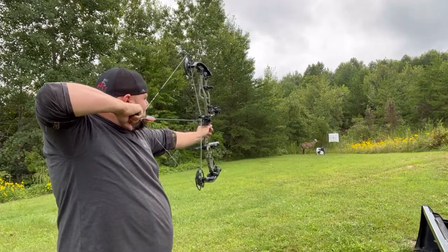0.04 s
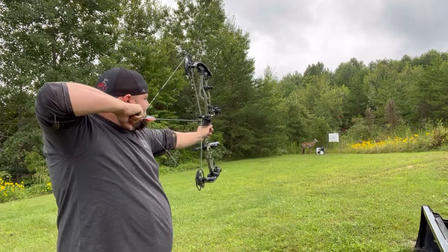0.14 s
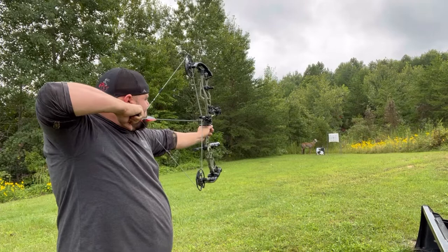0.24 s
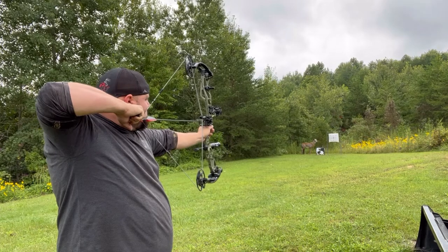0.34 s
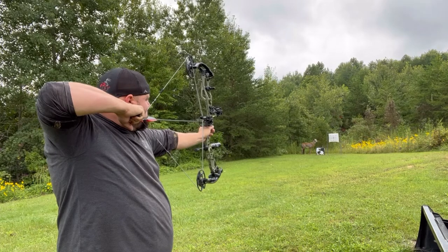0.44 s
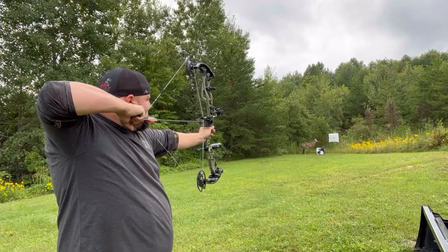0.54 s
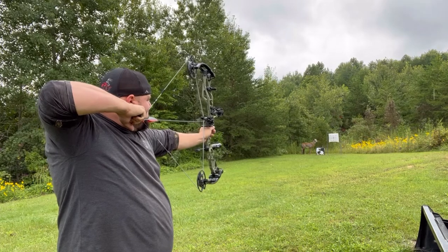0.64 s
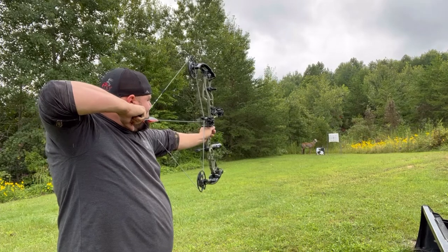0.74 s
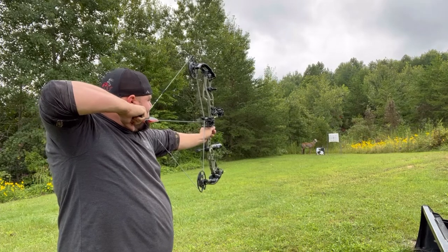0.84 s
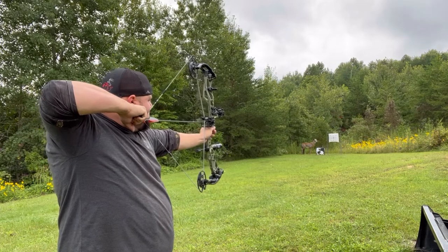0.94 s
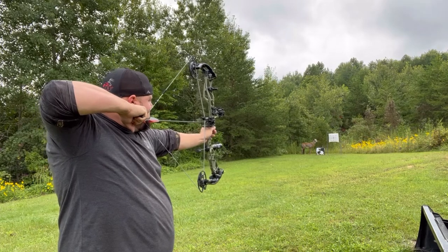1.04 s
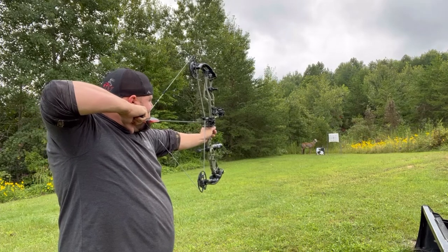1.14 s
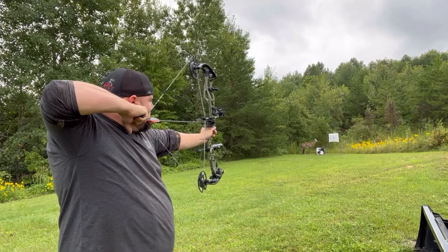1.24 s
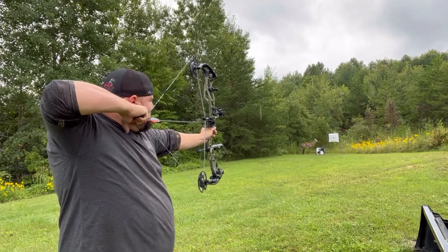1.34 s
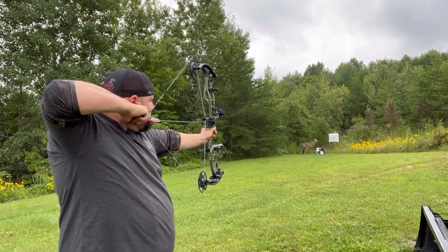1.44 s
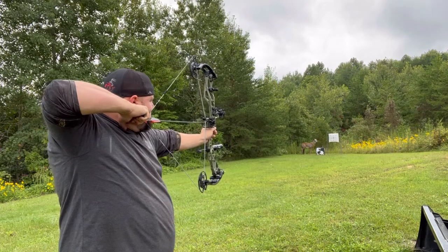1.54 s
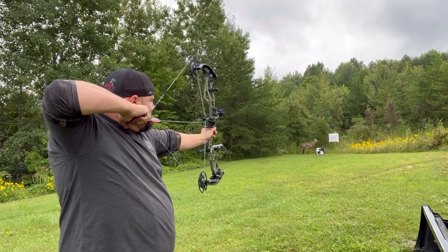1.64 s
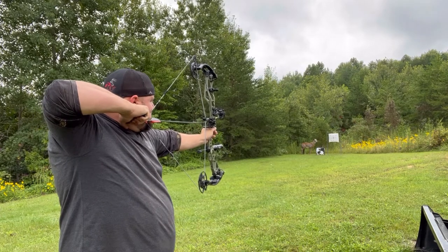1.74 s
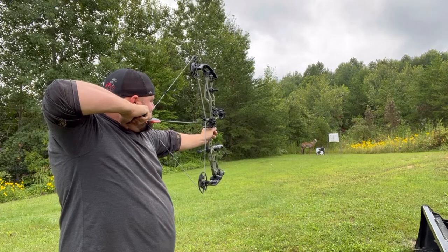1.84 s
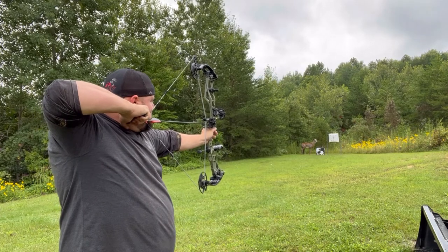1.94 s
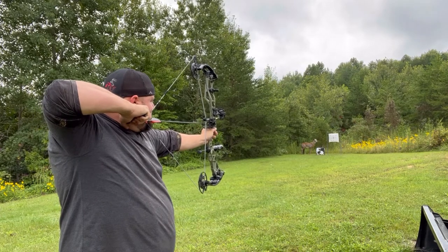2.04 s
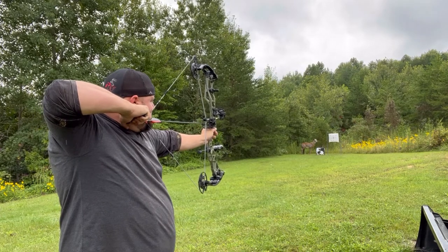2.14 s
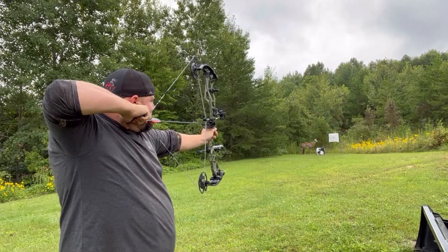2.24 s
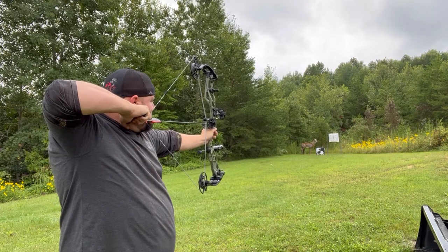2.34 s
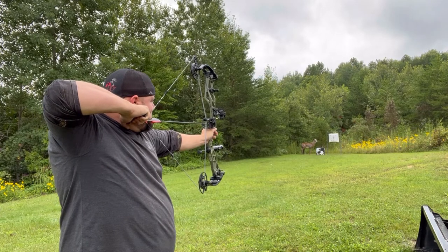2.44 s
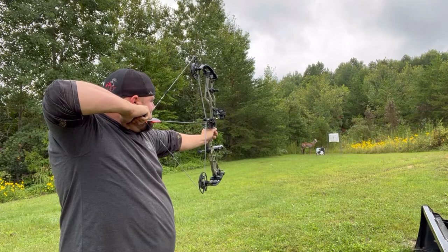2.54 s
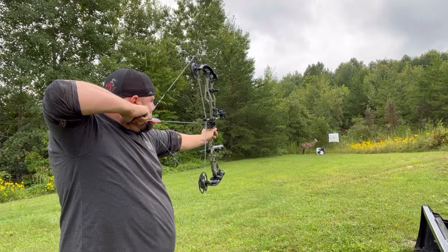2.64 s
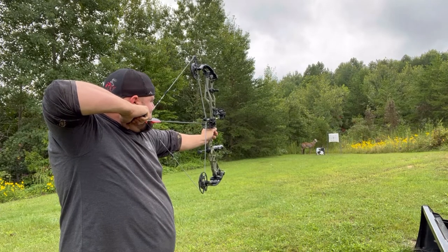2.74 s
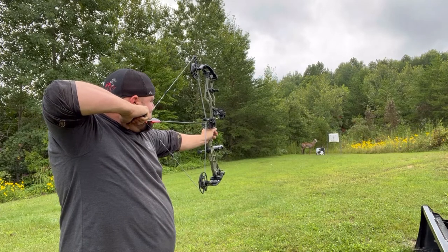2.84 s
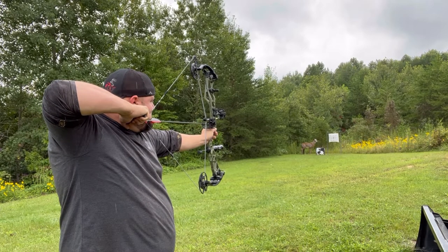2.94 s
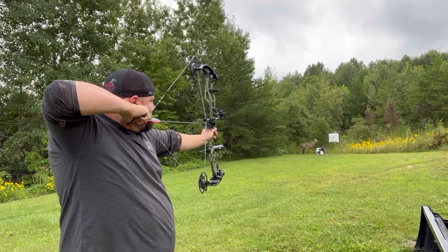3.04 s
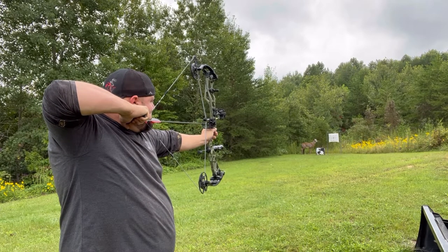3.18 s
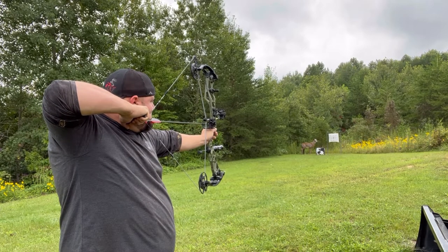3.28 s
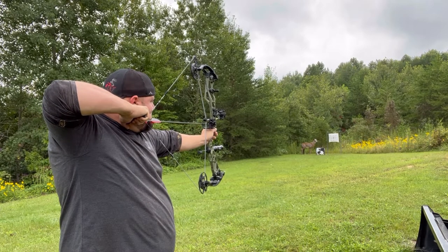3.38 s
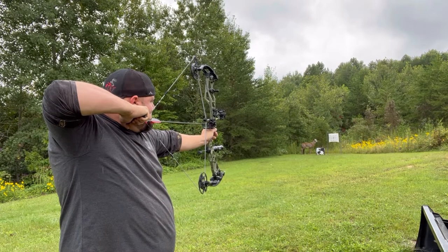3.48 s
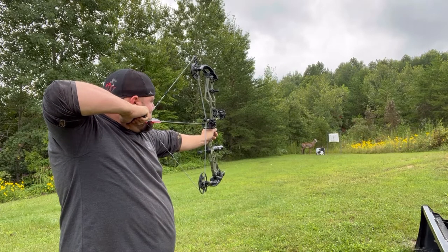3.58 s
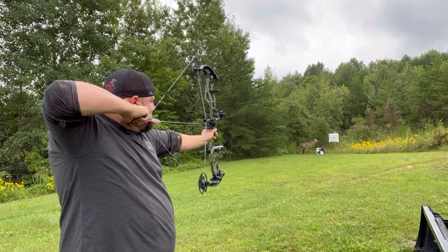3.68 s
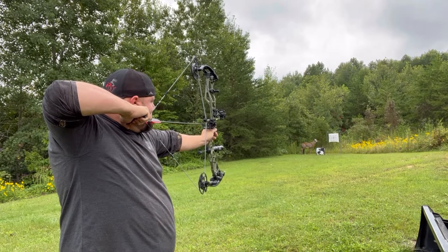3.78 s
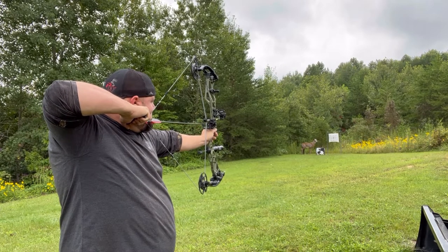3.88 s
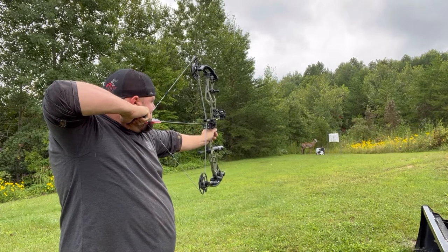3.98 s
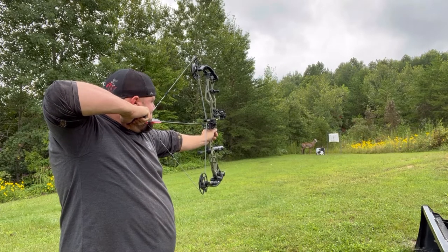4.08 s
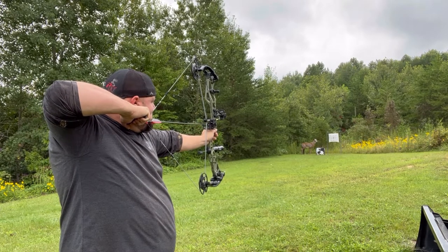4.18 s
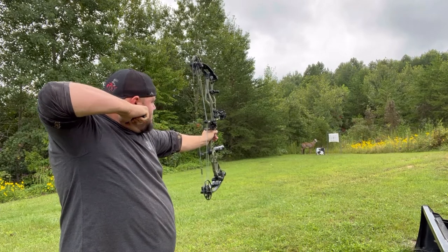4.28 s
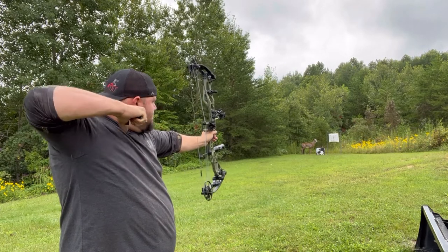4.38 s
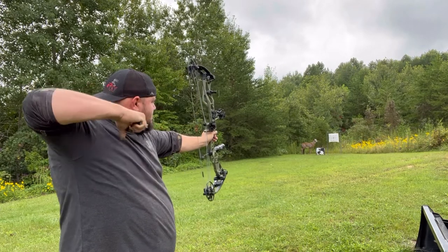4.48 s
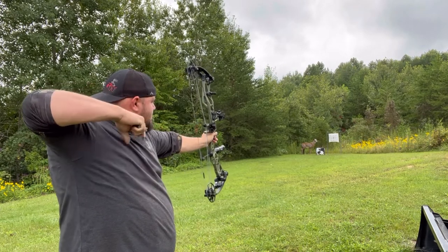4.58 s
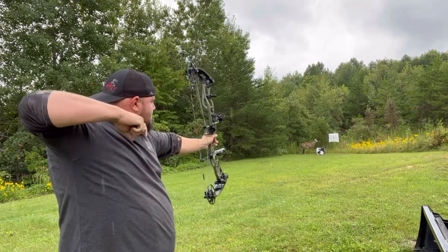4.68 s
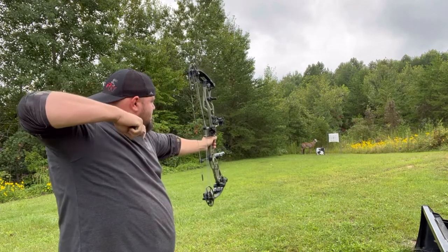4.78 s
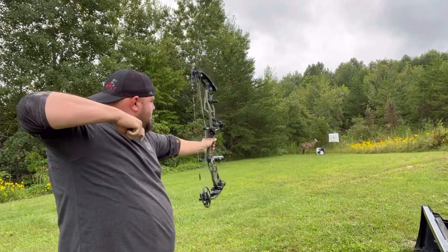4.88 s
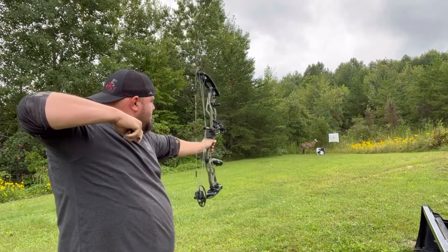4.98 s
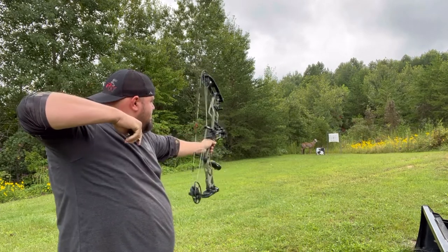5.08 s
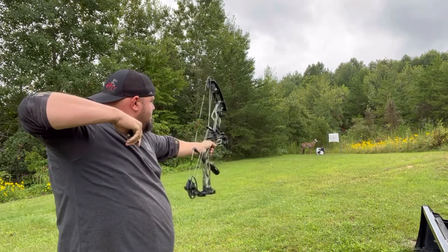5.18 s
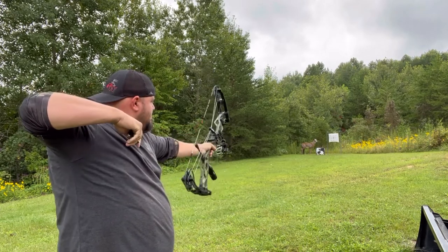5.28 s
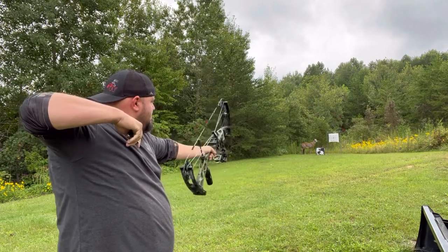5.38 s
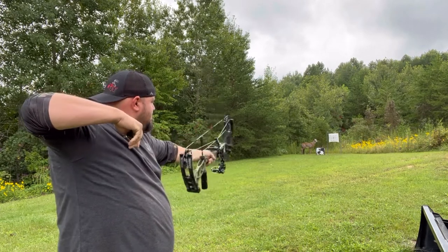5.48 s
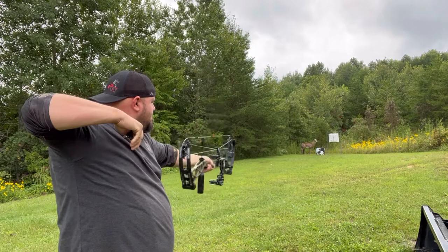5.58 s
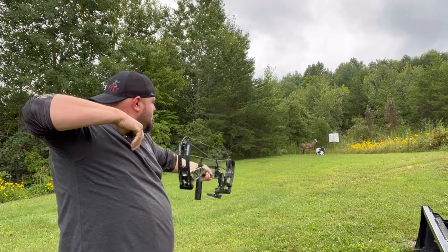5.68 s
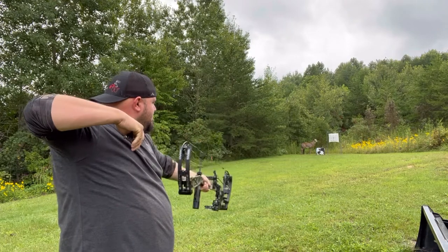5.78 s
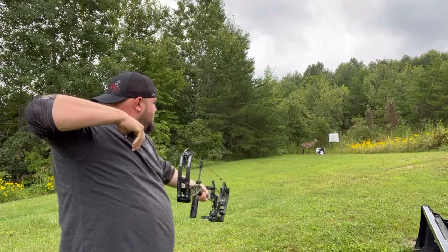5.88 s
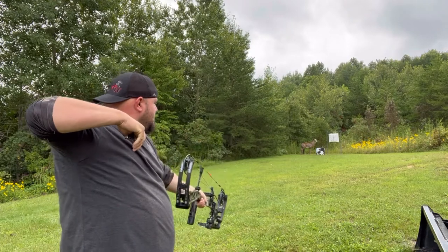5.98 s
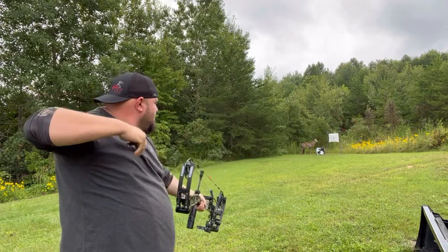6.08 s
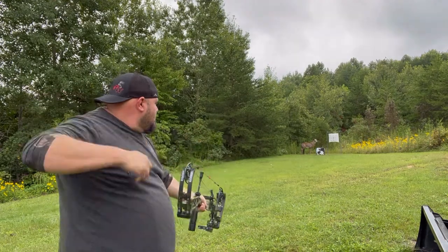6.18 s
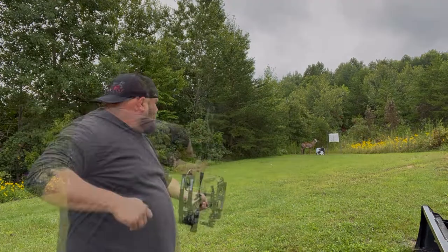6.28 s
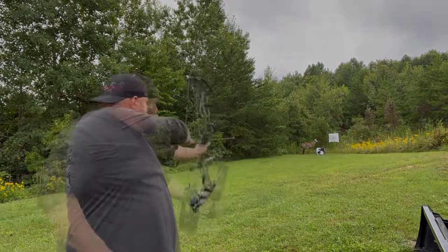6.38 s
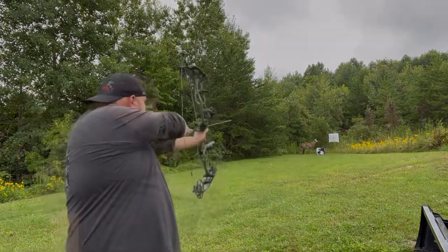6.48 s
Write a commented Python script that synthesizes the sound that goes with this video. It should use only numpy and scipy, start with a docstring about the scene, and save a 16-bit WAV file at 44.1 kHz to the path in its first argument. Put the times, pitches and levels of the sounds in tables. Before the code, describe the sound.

Steady high insect trilling outdoors, broken by a bow's click and loud twang-thump, then an arrow's hard thud, with insects continuing afterward.

```python
"""Crickets and a katydid sing all round a lawn at the edge of a wood: shaped noise pulsed by wing strokes.
A compound bow is shot: the release ticks, the arrow slides off, the string slams into its stop, and the
bow shudders, as decaying modes and noise bursts. A third of a second later the arrow smacks into the
target with a falling thud; ground and trees answer in grainy decaying bands. A soft thud follows."""
import sys
import numpy as np
from scipy import signal
from scipy.fft import rfft, irfft, next_fast_len
from scipy.io import wavfile

SR = 44100
rng = np.random.default_rng(int(sys.argv[2]) if len(sys.argv) > 2 else 0)


def materialize(psi):
    """Save the field psi as 16-bit PCM at rate SR to the path in sys.argv[1].

    A 1-D psi becomes a single channel; in a 2-D psi each row is a channel.
    """
    bounded = np.clip(np.atleast_2d(psi).T, -1, 1)
    quanta = np.round(bounded * 32767).astype(np.int16)
    wavfile.write(sys.argv[1], SR, quanta)


N = 287532
TIME = np.arange(N) / SR   # [s]


def from_db(db):
    """Logarithmic level: decibels become an amplitude gain."""
    return 10 ** (np.asarray(db) / 20)


def rms_one(x):
    """Normalisation: scale a signal to unit mean power."""
    return x / np.sqrt(np.mean(x ** 2) + 1e-20)


def at_hz(rows, hz):
    """Spectral interpolation: each column of a table, read on a logarithmic frequency axis."""
    f, *columns = np.transpose(rows)
    return [np.interp(np.log(hz + 1e-9), np.log(f), c) for c in columns]


def since(s):
    """Elapsed time: seconds gone by since a moment, zero before it."""
    return np.maximum(TIME - s, 0)


def drift(rate):
    """Random fluctuation: straight lines between normal random values, at so many values per second."""
    knots = rng.standard_normal(400)
    return np.interp(TIME * rate, np.arange(len(knots)), knots)


def throb(per_s, depth, wander=0.032):
    """Amplitude modulation: wing strokes at a slightly unsteady rate."""
    strokes = np.cumsum(per_s * (1 + wander * drift(4.3))) / SR
    return 1 + np.clip(depth, 0, 1) * np.sin(2 * np.pi * strokes)


def add(out, s, sound):
    """Superposition: mix a short sound in at a time."""
    at = int(round(s * SR))
    out[:, at:at + sound.shape[-1]] += sound[..., :N - at]


def pair(white, alike):
    """Interaural correlation: left and right as sum and difference of two unrelated noises."""
    alike = np.clip(alike, -.998, .998)
    common = np.sqrt(1 + alike) * white[0]
    opposed = np.sqrt(1 - alike) * white[1]
    return common + opposed * np.array([[1], [-1]])


# likeness of left and right: (frequency [Hz], correlation [-1 to 1])
EAR_LIKENESS = [(60, 0.61), (250, 0.47), (700, -0.1), (1500, -.1), (2300, 0.13), (2750, -0.25),
                (3000, -0.77), (3500, -0.011), (4100, 0.37), (5200, -0.29), (6800, 0.47), (8500, 0.76),
                (9700, 1), (11200, 0.99), (12400, 0.89), (13200, 1)]


def hiss(colour_db):
    """Spectral shaping: steady stereo noise coloured by a function of frequency, rms 1."""
    size = next_fast_len(N, real=True)
    hz = np.arange(size // 2 + 1) * SR / size
    white = rng.standard_normal((2, 2 * len(hz))).view(complex)
    spectrum = pair(white, at_hz(EAR_LIKENESS, hz)[0]) * from_db(colour_db(hz))
    return rms_one(irfft(spectrum, size)[:, :N])


def song(centre_hz, width_hz):
    """Resonance: noise in the band of many slightly different wings, 11 dB down one width off centre."""
    return hiss(lambda hz: -36 * np.log10(1 + ((hz - centre_hz) / width_hz) ** 2))


def band(x, low_hz, high_hz):
    """Causal filtering: a Butterworth band-pass."""
    edges_hz = [low_hz, min(high_hz, .45 * SR)]
    return signal.sosfilt(signal.butter(2, edges_hz, "band", fs=SR, output="sos"), x)


def burst(low_hz, high_hz, t60, alike):
    """Impulsive excitation: band noise of rms 1 under a sharp onset and an exponential decay."""
    t = TIME[:SR // 8]
    noise = rms_one(band(pair(rng.standard_normal((2, len(t))), alike), low_hz, high_hz))
    return noise * from_db(-60 * t / t60) * (1 - np.exp(-t / .0001))


def ringing(modes, spread_db):
    """Modal superposition: struck modes die away, each with a slightly random strength."""
    t = TIME[:SR // 2]
    hz, mode_db, t60 = np.transpose(modes)[:, :, None]
    level_db = mode_db + spread_db * rng.standard_normal(hz.shape) - 60 * t / t60
    return np.sum(from_db(level_db) * np.sin(2 * np.pi * hz * t), axis=0)


def tail(table, rise_s, alike_below_hz, lumpy_db, grain_db):
    """Diffuse scattering: half-octave noise bands die at their own rates, grainy, alike in the lows."""
    t, out = TIME[:int(SR * min(max(row[2] for row in table), 1))], 0   # at most 1 s
    lumps = drift(38)[:len(t)]
    grain_knots = rng.standard_normal(SR // 60)
    grains = from_db(grain_db * np.interp(t, TIME[:SR:60], grain_knots))
    white = rng.standard_normal((2, 2, SR))[..., :len(t)] * grains
    for k, low in enumerate(40 * 2 ** np.arange(0, 8.6, .5)):
        hz = low * 2 ** (1 / 4)
        level_db, t60 = at_hz(table, hz)
        alike = max(1.4 / (1 + (hz / alike_below_hz) ** 2) - .2, at_hz(EAR_LIKENESS, hz)[0])
        noise = pair(white[k % 2], alike)   # neighbouring bands get unrelated noise
        out = out + rms_one(band(noise, low, low * np.sqrt(2))) * from_db(level_db - 60 * t / t60)
    return out * (1 - np.exp(-t / rise_s)) * from_db(lumpy_db * lumps)


def to_ears(sound, lag_s):
    """Interaural delay: a mono sound reaches the right ear later by the lag, earlier if negative."""
    t = TIME[:len(sound)]
    return np.array([np.interp(t - max(late_s, 0), t, sound, left=0) for late_s in (-lag_s, lag_s)])


def thud(level_db, first_hz, glide_s, rise_s, fade_s):
    """Yielding impact: a blow on something that gives way swings ever more slowly."""
    t = TIME[:SR // 12]
    turns = first_hz * glide_s * np.log1p(t / glide_s)
    swell = (1 - np.exp(-(t / rise_s) ** 2)) * np.exp(-t / 0.06) / (1 + (t / fade_s) ** 2)
    return -from_db(level_db) * swell * np.sin(2 * np.pi * turns)


def swing(s, level_db, hz, cycles):
    """Gaussian tone burst: it peaks around a time and is down to 1/e the given cycles either side."""
    turns = (TIME - s) * hz
    return from_db(level_db) * np.exp(-(turns / cycles) ** 2) * np.sin(2 * np.pi * turns)


# from SWELL_START_S on, the air and most of the insects swell
INSECTS_GAIN_DB_PER_S = 0.277
SWELL_START_S, AIR_SWELL_DB_PER_S, INSECTS_SWELL_DB_PER_S = 5.91, 11, 5.5


def insect_swell():
    """Shared gain: a slow rise in decibels, then a faster one."""
    return from_db(INSECTS_GAIN_DB_PER_S * TIME + INSECTS_SWELL_DB_PER_S * since(SWELL_START_S))


# colour of the moving air: (frequency [Hz], relative level [dB])
AIR_COLOUR = [(20, -9.5), (55, 1.5), (100, 1.5), (170, -5.5), (250, -8), (310, -5), (400, -9.5),
              (600, -11.5), (1500, -13.5), (2200, -13.5), (4000, -25)]
# colour of the blurred far insects: (frequency [Hz], relative level [dB])
FAR_INSECT_COLOUR = [(1800, -25), (2800, -5), (3250, -6), (3600, -3), (4200, -2), (5100, -4.5),
                     (5600, -1.5), (7800, -3), (9000, -5.5), (11500, -8.5), (12900, -2), (14200, 2.5),
                     (15600, .5)]
AIR_DB, CHORUS_DB, FAR_INSECTS_DB = -70, -53, -53   # before the swells


def meadow():
    """Incoherent sum: moving air, a trilling carpet of ground crickets and the blur of far insects."""
    air_db = AIR_DB + AIR_SWELL_DB_PER_S * since(SWELL_START_S)
    air = from_db(air_db + drift(5.6)) * hiss(lambda hz: at_hz(AIR_COLOUR, hz)[0])
    chorus = from_db(CHORUS_DB) * throb(46, depth=0.11, wander=0.033) * song(6760, 820)
    far = from_db(FAR_INSECTS_DB) * hiss(lambda hz: at_hz(FAR_INSECT_COLOUR, hz)[0])
    return air + insect_swell() * (chorus * from_db([[-.5], [.5]]) + far)   # carpet slightly to the right


# single crickets, level before the shared swell; a start of 0 means already joining in:
# (start [s], centre [Hz], width [Hz], level [dB], pulses [1/s], pulse depth [0-1],
#  chirps [1/s], chirp depth [0-1])
CRICKET_VOICES = [(1.25, 2328, 130, -80.5, 10, 0.52, 1.3, .1), (1.7, 2760, 110, -76.5, 11, 0.38, .82, .1),
                  (2.2, 2985, 100, -76, 11, .2, 0.86, .1), (0, 3610, 90, -78.5, 30, .2, 1.1, .1),
                  (0, 4155, 70, -75, 30, .2, .6, .3), (0, 4710, 300, -68.8, 25, 0.35, 3.6, .25),
                  (0, 5260, 90, -76.5, 21, .3, .7, .2)]
CRICKET_ATTACK_S = 0.22


def crickets():
    """Double amplitude modulation: nearer crickets pulse and chirp, each on its own pitch."""
    out = 0
    for start_s, hz, width_hz, level_db, pulses, pulse_depth, chirps, chirp_depth in CRICKET_VOICES:
        strokes = throb(pulses, pulse_depth, wander=0.018) * throb(chirps, chirp_depth, wander=0.017)
        strokes = strokes * from_db(0.67 * drift(14))
        attack = 1 - np.exp(-since(start_s) / CRICKET_ATTACK_S)
        out = out + from_db(level_db) * attack * strokes * song(hz, width_hz)
    return insect_swell() * out


# pure trills out of the carpet: (frequency [Hz], level before the shared swell [dB])
TRILL_TONES = [(6842, -64), (7160, -69), (7345, -73), (6595, -69)]
TRILL_WANDER_HZ = 9


def trills():
    """Frequency wander: a few ground crickets hold nearly pure pitches, fading in and out."""
    out = 0
    for hz, level_db in TRILL_TONES:
        turns = np.cumsum(hz + TRILL_WANDER_HZ * drift(20)) / SR
        strength = from_db(level_db + 2.6 * drift(4.5)) * throb(46, depth=.4)
        out = out + strength * np.sin(2 * np.pi * turns)
    return insect_swell() * out


# level before the shared swell; the first chirp peaks at CHIRP_FIRST_S
CHIRP_DB, CHIRP_FIRST_S, CHIRPS_PER_S = -58.5, .14, 3.59
STROKES_PER_S, STROKE_START_HZ, STROKE_FALL_HZ = 25, 4874, 464


def near_cricket():
    """Frequency glide and convolution: uneven wing strokes slide down, blurred by echoes off the grass."""
    stroke = np.cumsum(STROKES_PER_S * (1 + .12 * drift(12))) / SR % 1   # place within the stroke
    turns = np.cumsum(STROKE_START_HZ - STROKE_FALL_HZ * stroke + 45 * drift(25)) / SR
    chirp = np.abs(np.cos(np.pi * CHIRPS_PER_S * (TIME - CHIRP_FIRST_S))) ** 1.3
    strength = from_db(CHIRP_DB + 1.5 * drift(20)) * chirp * np.sin(np.pi * stroke) ** 2
    call = strength * np.sin(2 * np.pi * turns)
    grass = burst(3500, 6600, t60=.05, alike=0.31)
    grass = grass / np.sqrt(np.sum(grass ** 2, axis=1, keepdims=True))   # unit energy in each ear
    echoes = signal.fftconvolve(call[None], grass, axes=1)[:, :N]
    return insect_swell() * (.7 * call + 0.59 * echoes)


# wing resonances: (centre [Hz], width [Hz], relative level [dB])
WING_RESONANCES = [(8800, 450, -6.5), (9920, 520, -3.5), (10600, 420, -7.5), (11300, 520, -8.5),
                   (10200, 3600, 2)]
# single ticks before and after the buzz: (time [s], level [dB])
SINGLE_TICKS = [(.056, -52), (.127, -53.5), (.211, -54.5), (.302, -53.5), (.389, -54.5), (.476, -54),
                (.557, -54.5), (.664, -57.5), (.757, -55), (.84, -56.5), (.921, -56), (1.006, -56),
                (1.082, -58), (1.159, -57.5), (1.237, -57), (1.316, -57), (1.388, -61), (4.721, -55.5),
                (4.796, -56), (4.864, -55), (4.939, -56), (5.018, -56), (5.092, -54.5), (5.168, -53),
                (5.244, -55), (5.321, -52), (5.393, -54), (5.465, -55.5), (5.555, -54), (5.626, -55),
                (5.713, -53.5), (5.789, -54.5), (5.89, -54), (5.965, -56.5), (6.042, -56), (6.125, -56.5),
                (6.203, -53), (6.289, -54)]
TICK_HALF_S = 0.0055   # from the peak to 1/e
# the long buzz swells, tires and stops
BUZZ_DB, BUZZ_HALF_UP_S, BUZZ_ATTACK_S = -53.5, 1.75, 0.25
BUZZ_TIRES_S, BUZZ_SAG_DB_PER_S = 4.4, 5
BUZZ_STOP_S, BUZZ_RELEASE_S = 4.55, .07


def katydid():
    """Source and resonator: uneven ticks, a swelling buzz, then ticks again drive the wing resonances."""
    attack = 1 / (1 + np.exp((BUZZ_HALF_UP_S - TIME) / BUZZ_ATTACK_S))
    hold = from_db(BUZZ_DB - BUZZ_SAG_DB_PER_S * since(BUZZ_TIRES_S))
    release_fade = np.exp(-since(BUZZ_STOP_S) / BUZZ_RELEASE_S)
    buzz = attack * hold * release_fade * throb(86, depth=0.26, wander=0.012)
    ticks, t = np.zeros((1, N)), TIME[:SR // 20] - 1 / 40
    for s, level_db in SINGLE_TICKS:
        add(ticks, s + t[0], from_db(level_db) * np.exp(-(t / TICK_HALF_S) ** 2))
    wings = sum(from_db(db) * song(hz, width_hz) for hz, width_hz, db in WING_RESONANCES)
    return (buzz + ticks) * rms_one(wings)


# soft low bumps around the shot: (time of the middle [s], level [dB], frequency [Hz])
LOW_BUMPS = [(3.169, -58, 110), (3.879, -58, 56.6), (4.405, -52.5, 62.8), (4.475, -56, 61.6)]
BUMP_CYCLES = 1.07
BOOM_HZ, BOOM_PEAK_S = 58.6, 0.02   # each heavy blow leaves a short low boom
BOW_BOOM_DB, TARGET_BOOM_DB = -37.5, -33.5


def boom(s, level_db):
    """Low-frequency response: a boom swells after a blow and dies in a few swings."""
    age = since(s) / BOOM_PEAK_S
    return from_db(level_db) * (age * np.exp(1 - age)) ** 2 * np.sin(2 * np.pi * BOOM_HZ * since(s))


def low_swings():
    """Low-frequency transients: faint bumps come and go, and the heavy blows leave a boom."""
    booms = boom(STRING_SLAMS[0][0], BOW_BOOM_DB) + boom(YIELDING_BLOWS[0][0], TARGET_BOOM_DB)
    return booms + sum(swing(s, db, hz, BUMP_CYCLES) for s, db, hz in LOW_BUMPS)


RASP_START_S, RASP_HZ, RASP_WIDTH_HZ, RASP_DB, RASP_DEPTH = 4.0, 4040, 680, -63, 0.64
RASP_BEAT_S, RASPS_PER_S = 4.83, 11.05   # a beat peaks at RASP_BEAT_S


def rasper():
    """Periodic modulation: an insect joins in and rasps with an even beat, about eleven times a second."""
    beat = 1 + RASP_DEPTH * np.cos(2 * np.pi * RASPS_PER_S * (TIME - RASP_BEAT_S))
    attack = 1 - np.exp(-since(RASP_START_S) / CRICKET_ATTACK_S)
    strokes = throb(22.2, depth=0.36)
    return from_db(RASP_DB) * attack * beat * strokes * song(RASP_HZ, RASP_WIDTH_HZ)


# sharp ticks of release, cams and arrow rest, levels before panning:
# (time [s], ring level [dB], t60 [s], ring frequency [Hz], snap level [dB])
RELEASE_TICKS = [(4.2176, -28, 0.0096, 2400, -32), (4.2190, -19, .006, 4310, -20.5),
                 (4.2211, -6.5, .008, 4180, -17), (4.2219, -20, .006, 3123, -17.5),
                 (4.226, -22, .01, 2772, -23), (4.2270, -23.5, .008, 4730, -21.5),
                 (4.3578, -25, .0055, 2200, -20), (4.364, -41, 0.0084, 2350, -34)]


def release():
    """Impact and friction: small hard parts tick and ring; the shaft hisses over the rest, gathering speed."""
    out, t = np.zeros((2, N)), TIME[:SR // 8]
    for s, ring_db, t60, hz, snap_db in RELEASE_TICKS:
        partials = np.sin(2 * np.pi * hz * t) + from_db(-8.5) * np.sin(2 * np.pi * 1.16 * hz * t)
        envelope = from_db(-60 * t / t60) * (1 - np.exp(-t / 0.0002))
        ring = to_ears(partials * envelope, lag_s=.00004)
        snap = burst(2300, 21000, t60, alike=0.29)
        body = burst(200, 700, t60=0.049, alike=0.98)
        add(out, s, from_db(ring_db) * (ring + from_db(-35.0) * body) + from_db(snap_db) * snap)
    add(out, 4.222, from_db(-41) * burst(2000, 11000, t60=0.07, alike=0.6))
    broad = burst(1500, 16000, t60=0.016, alike=.75)
    narrow = burst(3400, 4400, t60=0.025, alike=.75)
    slide = (broad + from_db(-6.5) * narrow)[:, ::-1]   # reversed: it grows until the string slams
    add(out, STRING_SLAMS[0][0] - slide.shape[1] / SR, from_db(-17.0) * slide)
    return out


# the string hits its stop and rebounds: (time [s], thump level [dB], thump frequency [Hz], crack level [dB])
STRING_SLAMS = [(4.2472, -10.5, 720, -12), (4.2537, -10, 390, -17.5), (4.255, -22.5, 1500, -21),
                (4.2576, -10, 900, -16), (4.2634, -23.5, 480, -28), (4.2686, -25, 200, -23.5),
                (4.2786, -21.5, 440, -32.5), (4.2836, -24.5, 420, -37), (4.3000, -30, 450, -40)]
# limbs, riser and cables: (frequency [Hz], level before spread and SHUDDER_DB [dB], t60 [s])
LIMB_MODES = [(105, -30, 0.1), (196, -17.5, 0.085), (320, -30, 0.13), (412, -19.5, 0.11), (448, -24, 0.1),
              (483, -23.5, 0.1), (537, -24, 0.1), (622, -23.5, 0.09), (822, -15, 0.048), (1020, -28, .05),
              (1075, -27, 0.05), (1227, -28, 0.08), (1364, -26, .06), (1705, -25, 0.06), (1785, -25, .06),
              (1995, -25, 0.06), (2202, -39, .1), (2380, -31, .06), (3175, -33, 0.09), (3480, -38, .11),
              (3756, -28, 0.06), (4100, -29, .07), (5141, -40, .1), (7187, -39, .15)]
# the buzz that dies in the bow and over the lawn: (frequency [Hz], band level [dB], t60 [s])
DYING_BUZZ = [(49.5, -45, .2), (111.9, -39, 0.14), (202, -34, 0.14), (450, -30, 0.135), (1007, -29.5, .155),
              (2000, -33.5, 0.17), (4064, -28.5, 0.14), (8060, -36, 0.18), (15000, -35, 0.16)]
# the shot coming back from the nearest trees: (frequency [Hz], band level [dB], t60 [s])
NEAREST_TREES = [(60.1, -63.5, .5), (300.6, -60, 0.52), (1000.5, -62.5, .55), (2800, -54.5, 0.54),
                 (5000, -68, .4), (14000, -69.5, .3)]
# the modes build up under the first slams; each thump falls to 1/e in about a cycle
SHUDDER_S, SHUDDER_RISE_S, SHUDDER_DB, THUMP_CYCLES = 4.2515, 0.0013, -.3, 1.1


def bow():
    """Impact and modal decay: the string thumps and cracks at its stop, rebounds, and the bow shudders."""
    out, t = np.zeros((2, N)), TIME[:SR // 2]
    for s, thump_db, hz, crack_db in STRING_SLAMS:
        add(out, s, -from_db(thump_db) * np.exp(-hz * t / THUMP_CYCLES) * np.sin(2 * np.pi * hz * t))
        add(out, s, from_db(crack_db) * burst(1100, 15000, t60=0.0075, alike=0.54))
    shudder = np.array([ringing(LIMB_MODES, spread_db=2.0) for ear in range(2)])
    add(out, SHUDDER_S, from_db(SHUDDER_DB) * shudder * (1 - np.exp(-t / SHUDDER_RISE_S)))
    add(out, 4.2500, tail(DYING_BUZZ, rise_s=.003, alike_below_hz=2500, lumpy_db=1.2, grain_db=3.5))
    add(out, 4.2900, tail(NEAREST_TREES, rise_s=.02, alike_below_hz=350, lumpy_db=-0.5, grain_db=2.5))
    return out


RATTLE_S, RATTLE_DB, RATTLES_PER_S, RATTLE_T60_S = 4.252, -21.5, 330, .11


def rattle():
    """Random impacts: loose cables and fittings chatter in a dying run of uneven taps."""
    out = np.zeros((2, N))
    for chance, size in zip(rng.random(26), rng.standard_normal(26)):
        age_s = chance * 26 / RATTLES_PER_S
        level_db = RATTLE_DB + 3 * size - 60 * age_s / RATTLE_T60_S
        add(out, RATTLE_S + age_s, from_db(level_db) * burst(900, 3200, t60=.007, alike=.6))
    return out


# the arrow's hit, then a late knock; levels before panning:
# (time [s], level [dB], first frequency [Hz], glide [s], rise [s], fade [s], right ear lag [s])
YIELDING_BLOWS = [(4.5861, -8.5, 1547, .00085, 0.00032, 0.0034, -.0002),
                  (5.7503, -34.3, 1254, 0.0012, 0.0015, 0.009, .00055)]
# the point striking home: (frequency [Hz], level [dB], t60 [s])
POINT_CRACK = [(2080, -2.5, 0.0034), (2840, -7.5, 0.0022), (3804, -16, 0.0023), (6227, -10, 0.0042),
               (10100, -20.5, 0.0017)]
# distinct returns from ground and trunks: (delay [s], level re the hit [dB], right ear lag [s])
HIT_REFLECTIONS = [(.0078, -16.5, -.0004), (0.014, -18, -.0005), (0.0181, -19.5, -.0005),
                   (.0215, -18, -.0005), (.037, -22.5, .0003)]
# arrow shaft and target ring: (frequency [Hz], level before spread and SHAFT_DB [dB], t60 [s])
SHAFT_AND_TARGET = [(148, -29.5, .22), (325, -26.5, .15), (563, -27.5, .11), (1350, -38, .13),
                    (2793, -45, .13), (3017, -46, .13)]
# scatter from the ground near the target: (frequency [Hz], band level [dB], t60 [s])
GROUND_SCATTER = [(55, -28, .09), (110, -27, 0.087), (200.4, -33, 0.072), (497, -27, 0.094),
                  (1010, -36, 0.13), (3000, -34.5, 0.2), (5000, -45, 0.084), (14000, -59, .1)]
# scatter from the wood's edge: (frequency [Hz], band level [dB], t60 [s])
WOOD_SCATTER = [(60, -58, 0.99), (150.4, -48, 0.46), (280, -44.5, 0.57), (500, -52.5, 0.68),
                (1000, -41.5, 0.42), (2990, -46, 0.8), (5000, -53.5, .4), (14100, -65.5, .3)]
# scatter from the far hillside: (frequency [Hz], band level [dB], t60 [s])
HILLSIDE_SCATTER = [(60.2, -84.5, 1.5), (294, -85, 3.3), (898, -63.5, 3.74), (2000, -66.5, 1.35),
                    (4970, -89, 1)]
HIT_PAN_DB, SHAFT_DB = -3.5, -.3   # the pan is left minus right
SLAP_S, SLAP_DB = 4.6038, -29.5   # a bright slap off the grass


def target():
    """Impact and reflection: the point cracks into the block with a falling thud; ground and trees answer."""
    out, t = np.zeros((2, N)), TIME[:SR // 12]
    hit_s, *shape, lag_s = YIELDING_BLOWS[0]
    body = thud(*shape)
    crack = sum(-from_db(db - 60 * t / t60) * np.sin(2 * np.pi * hz * t) for hz, db, t60 in POINT_CRACK)
    pan = from_db([[HIT_PAN_DB / 2], [-HIT_PAN_DB / 2]])
    add(out, hit_s, to_ears(body, lag_s) * pan + to_ears(crack, lag_s))
    for delay_s, level_db, lag_s in HIT_REFLECTIONS:
        add(out, hit_s + delay_s, from_db(level_db) * to_ears(body + from_db(-11) * crack, lag_s))
    add(out, hit_s + .004, from_db(SHAFT_DB) * ringing(SHAFT_AND_TARGET, spread_db=1.0))
    add(out, hit_s, from_db(-35) * burst(900, 3600, t60=0.08, alike=0.23))
    add(out, SLAP_S, from_db(SLAP_DB) * burst(4500, 7600, t60=.008, alike=.6))
    add(out, 4.6000, tail(GROUND_SCATTER, rise_s=0.0055, alike_below_hz=480, lumpy_db=1.0, grain_db=4.0))
    add(out, 4.6080, tail(WOOD_SCATTER, rise_s=.009, alike_below_hz=300, lumpy_db=1.6, grain_db=4))
    add(out, 4.7200, tail(HILLSIDE_SCATTER, rise_s=0.06, alike_below_hz=230, lumpy_db=1.5, grain_db=1))
    return out


# slaps of the hit from clumps of trees: (time [s], level [dB])
TREE_SLAPS = [(4.627, -34), (4.654, -42), (4.676, -39), (4.742, -48.5), (4.77, -49), (4.781, -50),
              (4.798, -49), (4.827, -49.5)]


def tree_echoes():
    """Discrete echo: clumps of trees throw the hit back as short, grainy slaps with a low body."""
    out = np.zeros((2, N))
    for s, level_db in TREE_SLAPS:
        slap = burst(600, 3400, t60=0.043, alike=.2)
        body = burst(130, 450, t60=0.07, alike=0.65)
        add(out, s, from_db(level_db) * (slap + from_db(-3.5) * body))
    return out


def late_thud():
    """Damped impact: a soft knock with a faint tap, lagging in the right ear, over a second after the hit."""
    out = np.zeros((2, N))
    s, *shape, lag_s = YIELDING_BLOWS[1]
    add(out, s, to_ears(thud(*shape), lag_s))
    add(out, s + .002, from_db(-55) * burst(300, 950, t60=.03, alike=.85))
    return out


# thin high peeps: (time of the middle [s], level [dB], frequency [Hz])
HIGH_PEEPS = [(6.178, -52, 8190), (6.216, -53, 8250)]


def peeps():
    """Tone burst: two thin, high peeps near the end."""
    return sum(swing(s, db, hz, cycles=73) for s, db, hz in HIGH_PEEPS)


def scene():
    """Superposition: the shot amid the insects; the release sits a little to the right."""
    insects = meadow() + crickets() + trills() + near_cricket() + katydid() + rasper() + peeps()
    shot = low_swings() + release() * from_db([[-1.4], [1.4]]) + bow() + rattle()
    return insects + shot + target() + tree_echoes() + late_thud()


# two microphone ports turn the treble against each other: (frequency [Hz], lead of left over right [rad])
PORT_LEAD = [(3500, 0), (5200, -1), (6900, -1.4), (8500, -.5), (9750, 0), (11200, .5), (12000, 1.3),
             (12600, 2.4), (13200, np.pi)]


def ports(x):
    """Phase difference: each channel is turned by half the lead, in opposite senses."""
    size = next_fast_len(N + SR // 10, real=True)
    lead, = at_hz(PORT_LEAD, np.arange(size // 2 + 1) * SR / size)
    return irfft(rfft(x, size) * np.exp(1j * lead * np.array([[.5], [-.5]])), size)[:, :N]


CEILING, CUTOFF_HZ = .88, 15700   # the ceiling is in full-scale amplitude


def record(dry):
    """Saturation and band limits: two ports, rumble cut, peaks rounded under a ceiling, then the top cut."""
    thinned = signal.sosfilt(signal.butter(3, 37, "high", fs=SR, output="sos"), ports(dry))
    rounded = thinned / np.sqrt(np.sqrt(1 + np.square(np.square(thinned / CEILING))))
    return signal.sosfilt(signal.ellip(10, .2, 70, CUTOFF_HZ, fs=SR, output="sos"), rounded)


dry = scene()
out = record(dry)
materialize(out)
```